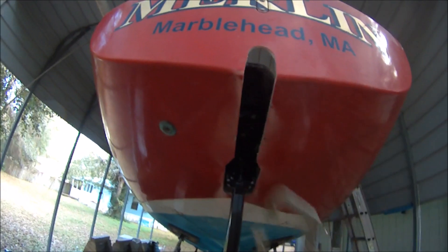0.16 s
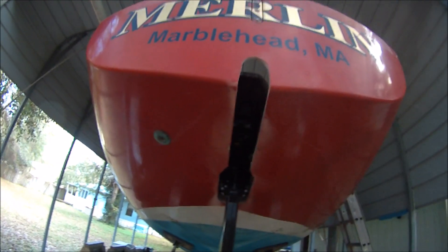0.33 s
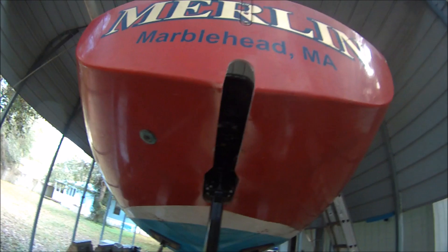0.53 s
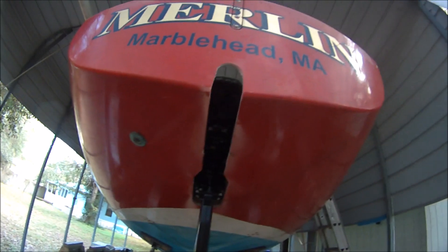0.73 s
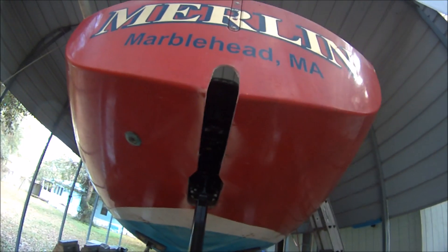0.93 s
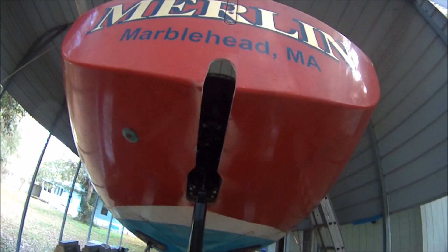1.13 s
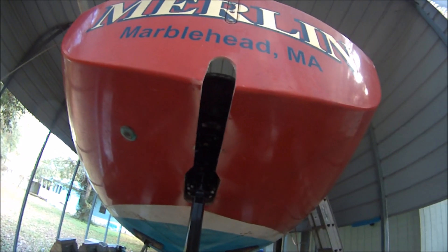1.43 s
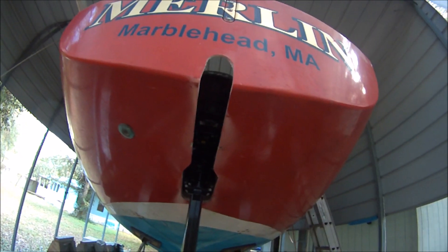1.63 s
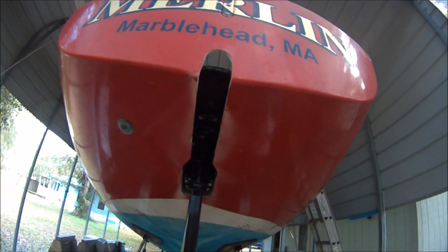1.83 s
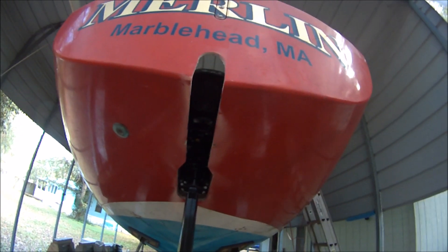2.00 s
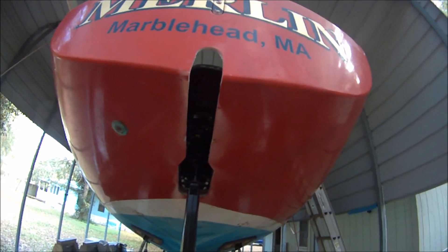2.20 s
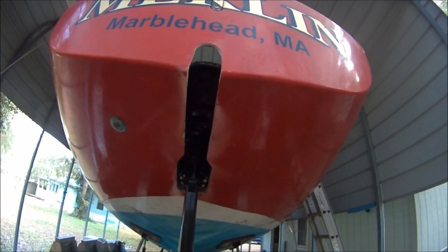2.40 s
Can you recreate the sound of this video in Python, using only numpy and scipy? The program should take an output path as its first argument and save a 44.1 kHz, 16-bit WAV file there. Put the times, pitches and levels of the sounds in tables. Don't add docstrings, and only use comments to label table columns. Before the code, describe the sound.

A sharp clack of locking pliers releasing from wood against a hull, rattle, then light steel clicks

```python
import sys
import numpy as np
from scipy import signal
from scipy.io import wavfile

SR = 44100
rng = np.random.default_rng(int(sys.argv[2]) if len(sys.argv) > 2 else 0)


def rack_gain(trim_db):
    fader = np.asarray(trim_db, float)
    return 10 ** (fader / 20)


def dump_mix(stems):
    frames = np.atleast_2d(stems).T
    limited = np.clip(frames, -1, 1)
    pcm = np.round(limited * 32767).astype(np.int16)
    wavfile.write(sys.argv[1], SR, pcm)


N = 112454


def rms_one(x):
    return x / np.sqrt(np.mean(x ** 2) + 1e-20)


def at_hz(points, hz):
    table_hz, values = np.array(points)[:, 0], np.array(points)[:, 1]
    return np.interp(np.log(hz), np.log(table_hz), values)


def cut(x, hz, kind, order=2):
    return signal.sosfilt(signal.butter(order, hz, kind, fs=SR, output="sos"), x)


def train(s, db):
    clicks = np.full(N, 1e-18)
    np.add.at(clicks, (np.asarray(s) * SR).astype(int), rack_gain(np.asarray(db)))
    return clicks


def ring(clicks, hz, t60):
    decay, turn = rack_gain(-60 / (t60 * SR)), 2 * np.pi * hz / SR
    return signal.lfilter([0, np.sin(turn)], [1, -2 * decay * np.cos(turn), decay * decay], clicks)


def burst(t60):
    t = np.arange(SR // 20) / SR
    return rng.standard_normal(len(t)) * rack_gain(-60 * t / t60)


def drift(rate):
    r = np.exp(-80 * np.pi * rate / SR)
    slow = signal.lfilter([1], [1, -2 * r, r * r], rng.standard_normal(N // 40 + 2002))[2000:]
    return np.interp(np.arange(N) / 40, np.arange(len(slow)), rms_one(slow))


def bands(spectrum, size):
    edges = 22 * 2 ** np.arange(0, 9.6, 1 / 3)
    white = rng.standard_normal((2, size + 4000))
    for k, (low, high) in enumerate(zip(edges, edges[1:])):
        hz = np.sqrt(low * high)
        if spectrum[0][0] / 1.2 < hz < spectrum[-1][0] * 1.1:
            noise = cut(white[k % 2], [low, high], "band")
            yield hz, rack_gain(at_hz(spectrum, hz)) * noise[4000:]


def steady(spectrum, patchy_db):
    together = drift(0.91)
    total = 0
    for hz, band in bands(spectrum, size=N):
        total = total + band * rack_gain(patchy_db * (0.83 * together + drift(9)))
    return rms_one(total)


# (frequency [Hz], level [dB])
YARD_COLOUR = [(21, -40.5), (35, -12.5), (164, -9), (342, 1), (585, -2), (772, 1), (1190, -1),
               (2340, -21.5), (4000, -31.5), (5200, -61.5), (8800, -120)]


def yard():
    return rack_gain(-52.5) * steady(YARD_COLOUR, patchy_db=0.38)


# (frequency [Hz], level [dB])
HISS_COLOUR = [(1470, -29), (2500, -6), (4010, -4.5), (4930, -1), (14300, -5), (15500, -13)]
HISS_DB, HISS_SIDE_DB = -75, -5


def hiss(db):
    return rack_gain(db) * steady(HISS_COLOUR, patchy_db=.3)


# (frequency [Hz], width [Hz], level [dB])
MOTOR_HUMS = [(70, 3.3, -74.5), (127, 4, -75.5)]
# (start [s], end [s], level [dB])
WHINE_SPELLS = [
    (-.1, 0.286, -55.5),
    (0.276, 0.392, -60.5),
    (0.614, 1.212, -59),
    (1.5, 1.68, -61),
    (1.814, 2.157, -61.5),
    (2.327, 2.699, -60.5),
]
WHINE_HZ, WHINE_EDGE_S = 1225, 0.033


def motors():
    t = np.arange(N) / SR
    hums = 0
    for hz, width, db in MOTOR_HUMS:
        tone = np.sin(2 * np.pi * hz * t + 1.1 * drift(width))
        hums = hums + rack_gain(db) * rms_one(tone * (1 + .35 * drift(width)))
    gate = 0
    for start, end, db in WHINE_SPELLS:
        gate = gate + rack_gain(db) * np.clip(np.minimum(t - start, end - t) / WHINE_EDGE_S, 0, 1)
    whine = np.sin(2 * np.pi * WHINE_HZ * t + .3 * drift(2.6))
    return hums + np.sqrt(2) * gate * rack_gain(0.66 * drift(6.5)) * whine


# (time [s], level [dB], first ring [Hz], second ring [Hz], second ring level [dB])
PLIER_CLICKS = [(1.6533, -47.5, 2764, 5560, -0.5), (1.6539, -52, 9300, 10340, -3),
                (1.6550, -51, 5000, 7300, -7), (1.6660, -57, 3400, 4070, -2), (1.6780, -58, 3400, 3000, -2),
                (1.6940, -61, 2900, 5140, -7), (1.754, -68, 3620, 3700, -4), (1.768, -60, 10600, 5230, -3),
                (1.7733, -50, 3500, 6260, -18), (1.773, -61, 2910, 5100, -15),
                (1.851, -46.5, 2840, 4830, -12), (1.8520, -57.5, 3900, 5500, -11),
                (1.9971, -45, 3600, 5450, -2), (1.9980, -63.5, 9000, 7000, 5)]
CLICK_T60_S, CLICK_SNAP_DB = .031, -4


def pliers():
    out = 0
    for s, db, hz, second_hz, second_db in PLIER_CLICKS:
        click = train([s], [db])
        low, high = min(hz, second_hz), max(hz, second_hz)
        snap = signal.fftconvolve(click, burst(0.0204))[:N]
        snap = cut(snap, [low * 0.45, high * 1.1], "band")
        first = ring(click, hz, CLICK_T60_S * (3000 / hz) ** .4)
        second = rack_gain(second_db) * ring(click, second_hz, CLICK_T60_S * .8)
        steel = cut(first + second, [low * 1.1, high * 1.3], "band", order=1)
        out = out + steel + rack_gain(CLICK_SNAP_DB) * snap
    return out


# (frequency [Hz], level [dB per Hz])
SHED_COLOUR = [(80, -47), (200, -32), (400, -6.5), (1300, 2), (2200, -5.5), (4000, -21), (8000, -37.5),
               (15500, -51.5)]
# (frequency [Hz], time to fall 60 dB [s])
SHED_DECAY = [(100, 0.09), (300, 0.067), (1000, 0.2), (3000, 0.14), (8000, .25), (15000, .2)]
SHED_DB, SHED_RISE_S = -13.5, 0.0026
LATE_DB, LATE_STRETCH, LATE_TILT = -19, 2.1, .4


def shed(clicks):
    t = np.arange(SR // 2) / SR
    tail = 0
    for hz, band in bands(SHED_COLOUR, size=len(t)):
        t60 = at_hz(SHED_DECAY, hz)
        early = rack_gain(-60 * t / t60)
        late = rack_gain(LATE_DB) * (hz / 2000) ** LATE_TILT * rack_gain(-60 * t / t60 / LATE_STRETCH)
        tail = tail + band * (early + late)
    tail = tail / np.sqrt(np.mean(tail[:1000] ** 2)) * (1 - np.exp(-t / SHED_RISE_S))
    return rack_gain(SHED_DB) * signal.fftconvolve(clicks, tail)[:N]


# (frequency [Hz], level [dB], time to fall 60 dB [s])
HULL_MODES = [(253, -31, 1.2), (358, -12, .2), (517.7, -13.5, .3), (698.7, -0.5, 0.3), (814, -1, .2),
              (992, -16, 0.29), (1186, -8.5, .18), (1294, 5, 0.12), (1334, 2, 0.11), (1380, -12, .35),
              (1525, -6, .14), (1840, -19, .24), (2077, -28, .7), (2135, -24, .3)]
BLOW_S, BLOW_DB, SWELL_T60_S = .5566, -11, 0.028
DAMPED_S, DAMPED_DB_PER_S, DAMPED_BELOW_HZ = 0.745, 500, 900
WAVER_DB, WAVER_PER_S = 2.5, 25


def hull():
    since_hand = np.maximum(np.arange(N) / SR - DAMPED_S, 0)
    hand = rack_gain(-DAMPED_DB_PER_S * since_hand)
    out = 0
    for k, (hz, db, t60) in enumerate(HULL_MODES):
        click = train([BLOW_S], [BLOW_DB + db]) * (-1) ** k
        swelling = ring(click, hz, t60) - ring(click, hz, SWELL_T60_S)
        shape = hand if hz < DAMPED_BELOW_HZ else rack_gain(WAVER_DB * drift(WAVER_PER_S))
        out = out + swelling * shape
    return out


def struck(s, db, modes):
    luck_db = 0.5 * rng.standard_normal((len(s), len(modes)))
    out = 0
    for k, (hz, mode_db, t60) in enumerate(modes):
        out = out + ring(train(s, db + mode_db + luck_db[:, k]), hz, t60)
    return out


BODY_LOW_HZ, SOFT_HZ = 199.5, 2010
# (frequency [Hz], level [dB], time to fall 60 dB [s])
TEMPLATE_MODES = [(508, -8.5, 0.14), (810.3, 0.5, 0.38), (926, -13, 0.21), (1160, -11, .05), (1405, -1, .1),
                  (1520, -10.5, .08), (1858, -12.5, 0.18), (2120, -16.5, .12)]
# (frequency [Hz], level [dB], time to fall 60 dB [s])
STAND_MODES = [(511, -25.5, 0.18), (833, -3, 0.18), (1360, -7, 0.18), (1495, -3, 0.041),
               (1873, -19.5, 0.13), (1998, -3, 0.11), (2309, -26, 0.26), (2950, -28, 0.099)]
# (time [s], bare knock [dB], ring [dB])
SOFT_TAPS = [
    (.5222, -22.5, -17),
    (.7104, -34.5, -34),
    (.7260, -38, -44),
]
# (time [s], bare knock [dB], ring [dB])
STAND_BOUNCES = [
    (.7548, -34, -27),
    (.7600, -34, -33),
    (.7640, -33, -33),
    (.7780, -39, -59),
]


def soft_contacts():
    tap_s, tap_knock_db, tap_ring_db = np.transpose(SOFT_TAPS)
    bounce_s, bounce_knock_db, bounce_ring_db = np.transpose(STAND_BOUNCES)
    pulses = train(tap_s, tap_knock_db) + train(bounce_s, bounce_knock_db)
    template = struck(tap_s, tap_ring_db, TEMPLATE_MODES)
    stand = struck(bounce_s, bounce_ring_db, STAND_MODES)
    rings = cut(template + stand, [BODY_LOW_HZ * 1.7, SOFT_HZ], "band")
    return 2.5 * cut(pulses, SOFT_HZ, "low"), rings


def bare_knock(clicks):
    return 1.63 * cut(ring(clicks, hz=1510, t60=.0045), [600, 3000], "band")


CRACK_DB, CRACK_T60_S, CRACK_LOW_HZ, CRACK_HIGH_HZ = -4, 0.012, 2400, 5500
SNAP_DB, SNAP_HZ, SNAP_T60_S = 1, 3700, 0.01


def crack(s, db):
    noise = signal.fftconvolve(train(s, db + CRACK_DB), burst(CRACK_T60_S))[:N]
    noise = cut(noise, CRACK_LOW_HZ, "high")
    noise = cut(noise, CRACK_HIGH_HZ, "low") + rack_gain(-17) * noise
    jaw = ring(train(s, db + SNAP_DB), SNAP_HZ, SNAP_T60_S)
    return noise + cut(jaw, CRACK_LOW_HZ, "high")


# (time [s], bare knock [dB], crack [dB], shed [dB])
HULL_KNOCKS = [(0.5182, -35.5, -60, -43), (0.521, -22, -25.5, -16), (0.523, -19.5, -27.5, -24),
               (0.5365, -31.5, -31, -27.5), (0.5564, 3, -11.5, -8.5), (.5600, -6, -29, -16.5),
               (.5622, -14, -29, -21.5), (0.566, -13, -30.5, -19.5), (0.567, -2, -29.5, -19),
               (0.5709, -10.5, -32.5, -22.5), (.5815, -18, -40.5, -26.5), (0.7101, -52, -66, -46),
               (.7260, -52, -66, -44), (0.7542, -37, -46, -35.5), (1.4600, -37, -60, -66)]


def release():
    s, knock_db, crack_db, shed_db = np.transpose(HULL_KNOCKS)
    soft, rings = soft_contacts()
    cracks = crack(s, crack_db)
    scatter = shed(train(s, shed_db) + rack_gain(-8) * cut(soft, 650, "high"))
    direct = bare_knock(train(s, knock_db) + soft) + cracks + rings
    return cut(direct, BODY_LOW_HZ, "high") + hull() + scatter, scatter + cracks


def scene():
    knocks, scatter = release()
    mid = yard() + hiss(HISS_DB) + motors() + pliers() + knocks
    side = hiss(HISS_DB + HISS_SIDE_DB)
    side = side + rack_gain(-25) * cut(np.roll(scatter, 7), 5000, "high")
    return np.array([rack_gain(-.2) * mid + side, mid - side])


def roll_off(x):
    return signal.sosfilt(signal.butter(12, 16180, fs=SR, output="sos"), x)


# (time [s], level [dB])
RECORDER_GAIN = [
    (0, -2),
    (.6, -2.5),
    (.7, -3.5),
    (.8, -8),
    (1.12, -9),
    (1.22, -4.5),
    (1.4, -4.43),
    (2.55, -4.7),
]
CEILING, CUTOFF_HZ = .95, 15550


def record(dry):
    s, db = np.transpose(RECORDER_GAIN)
    gain = rack_gain(np.interp(np.arange(N) / SR, s, db))
    held = np.clip(dry * gain, -CEILING, CEILING)
    held = signal.sosfilt(signal.cheby2(12, 60, CUTOFF_HZ, fs=SR, output="sos"), held)
    return roll_off(held)


dry = scene()
out = record(dry)
dump_mix(out)
```